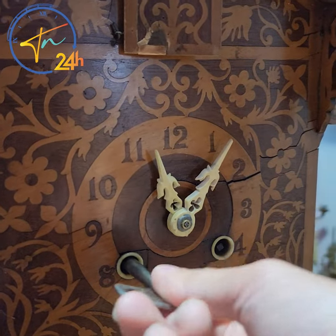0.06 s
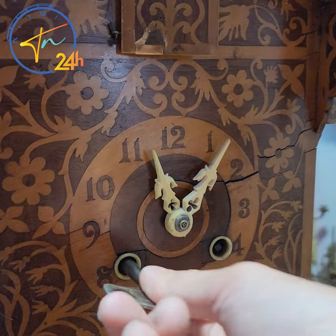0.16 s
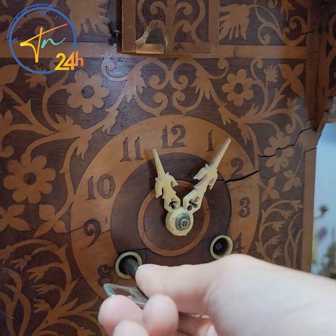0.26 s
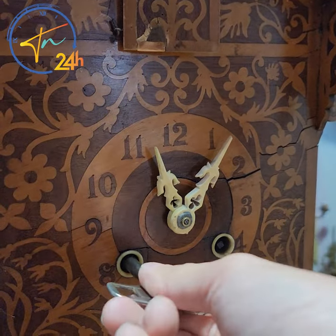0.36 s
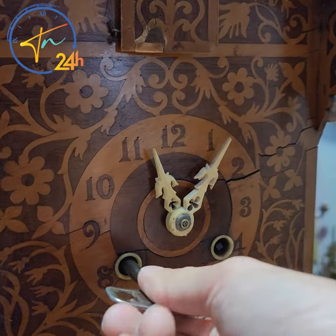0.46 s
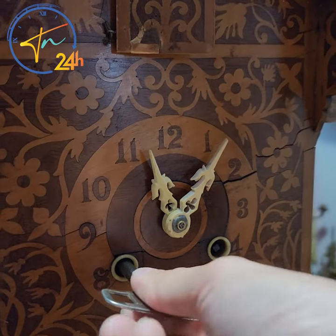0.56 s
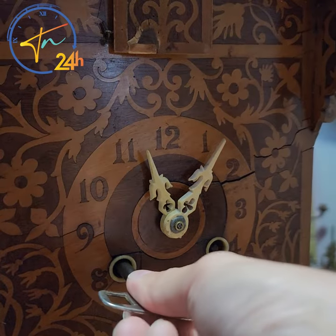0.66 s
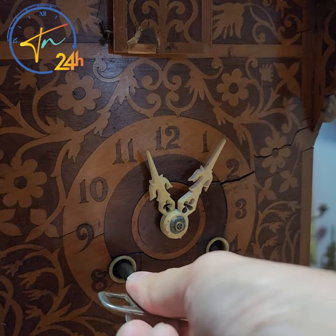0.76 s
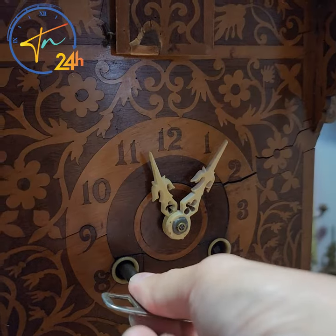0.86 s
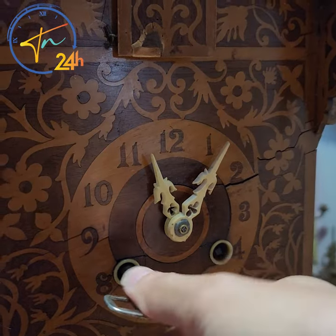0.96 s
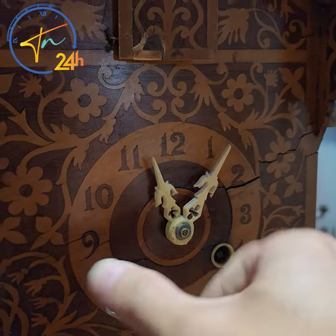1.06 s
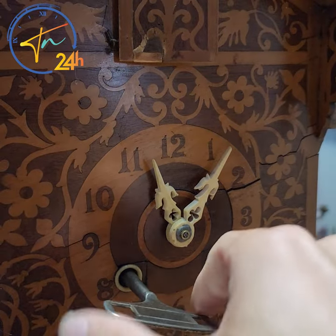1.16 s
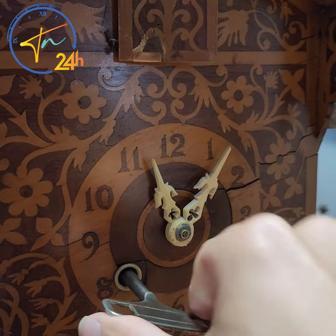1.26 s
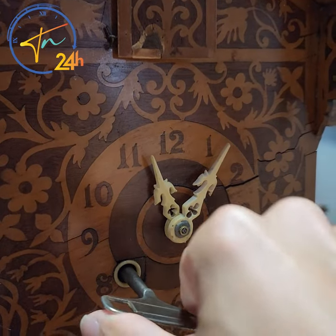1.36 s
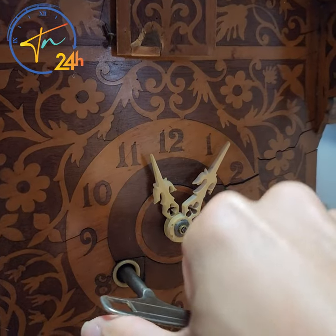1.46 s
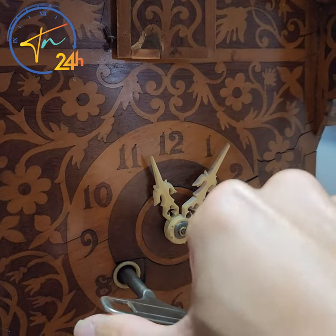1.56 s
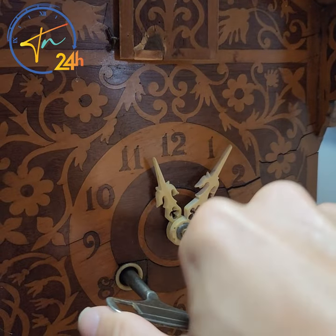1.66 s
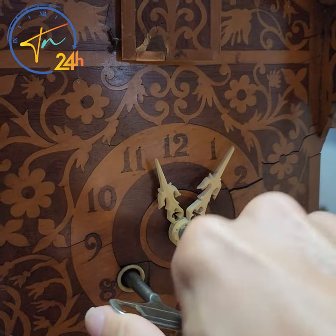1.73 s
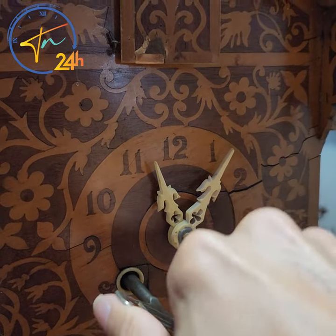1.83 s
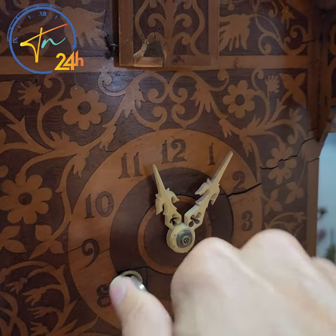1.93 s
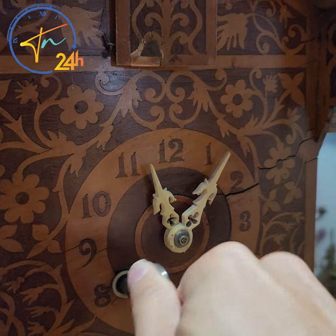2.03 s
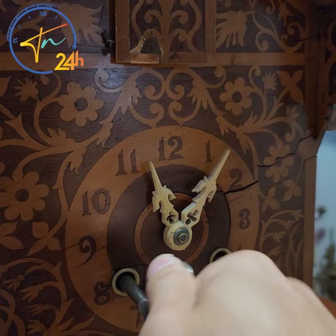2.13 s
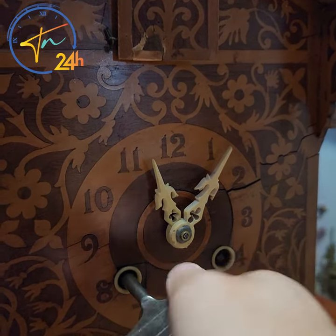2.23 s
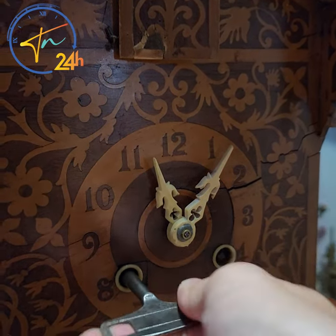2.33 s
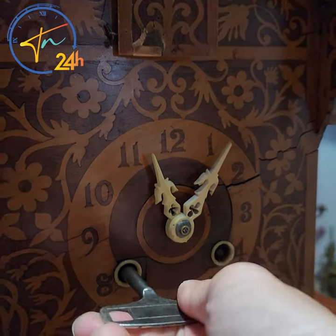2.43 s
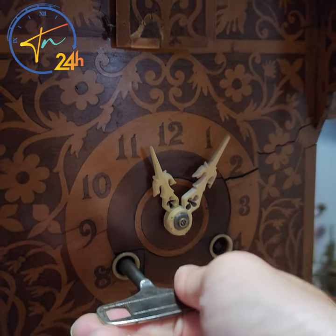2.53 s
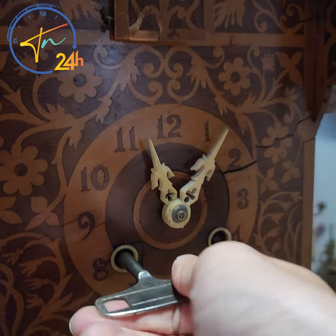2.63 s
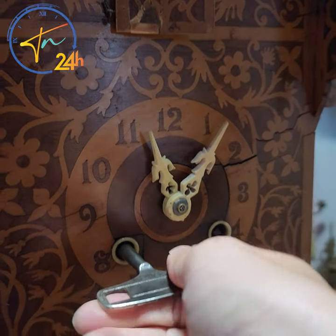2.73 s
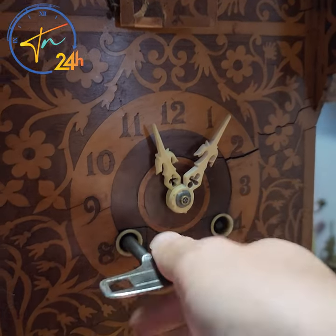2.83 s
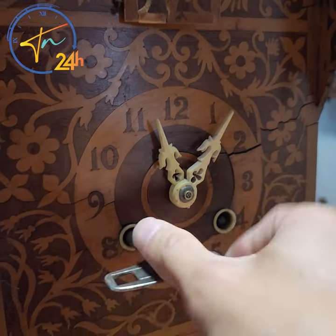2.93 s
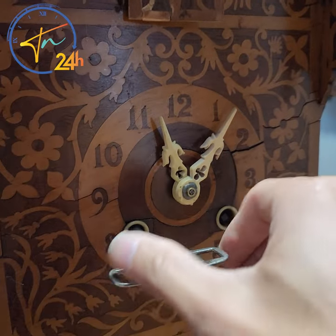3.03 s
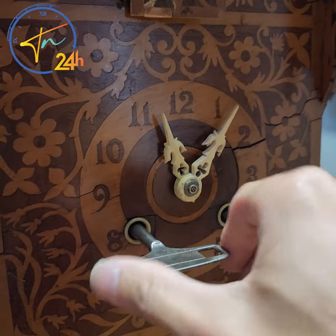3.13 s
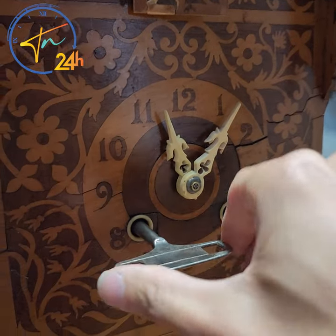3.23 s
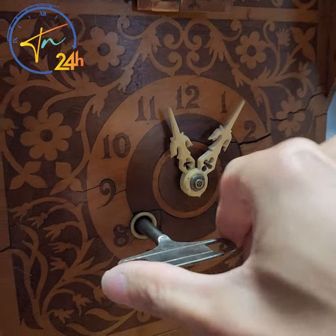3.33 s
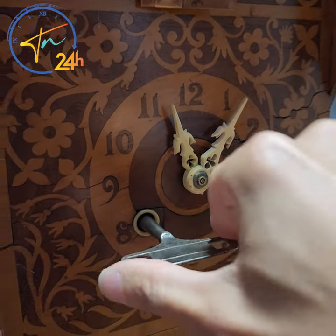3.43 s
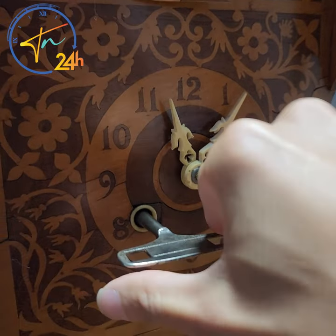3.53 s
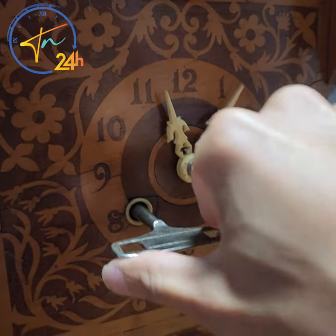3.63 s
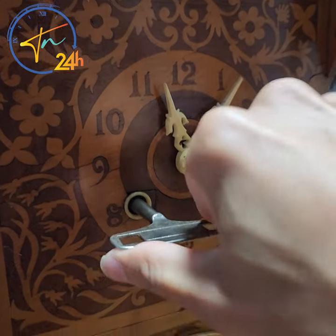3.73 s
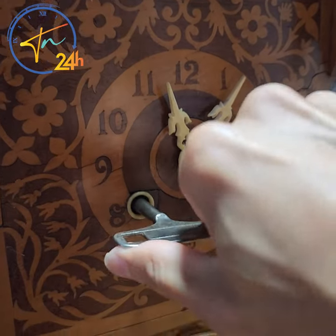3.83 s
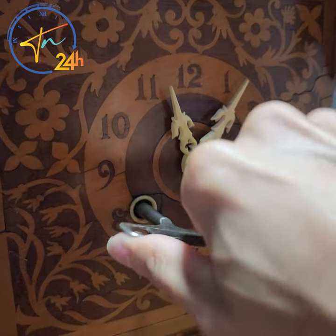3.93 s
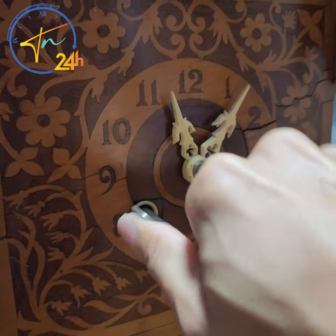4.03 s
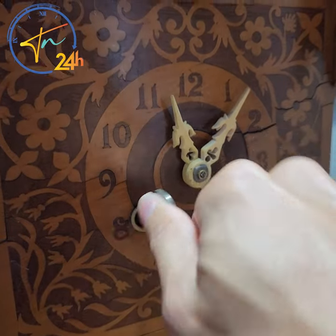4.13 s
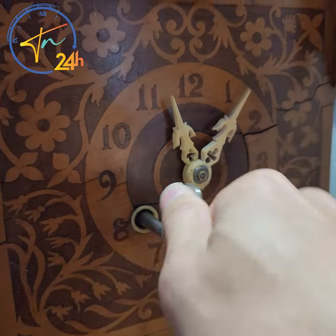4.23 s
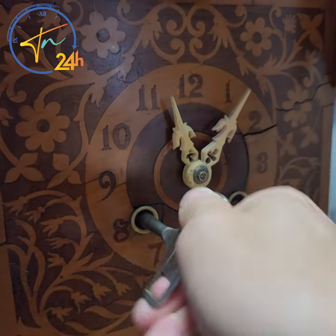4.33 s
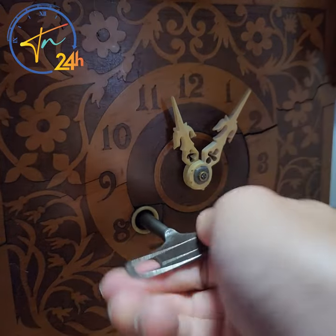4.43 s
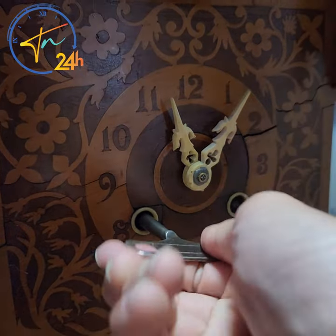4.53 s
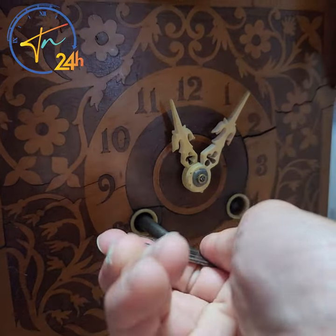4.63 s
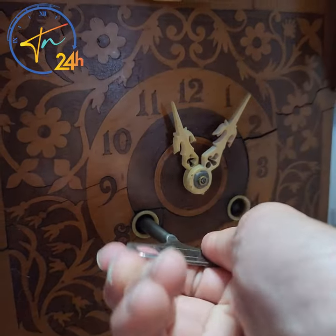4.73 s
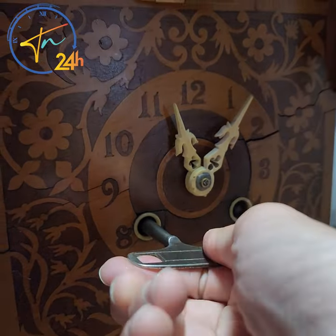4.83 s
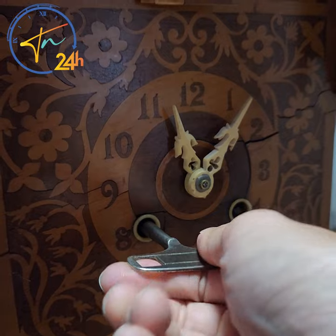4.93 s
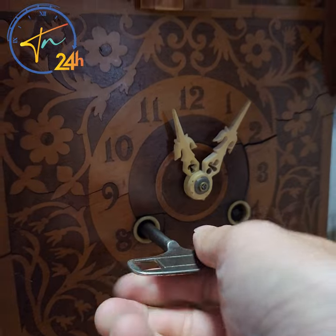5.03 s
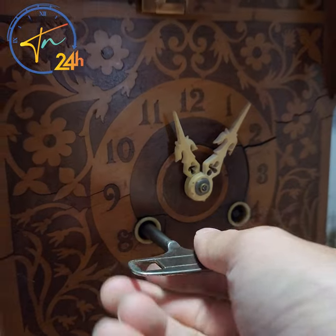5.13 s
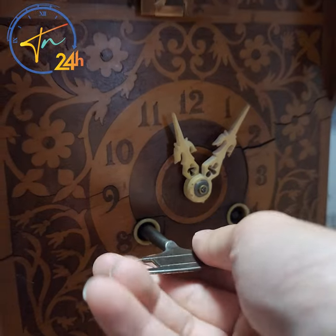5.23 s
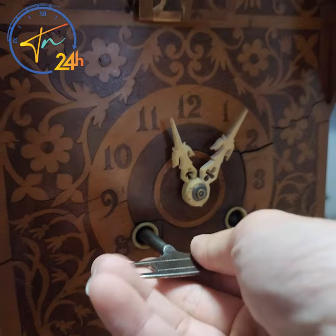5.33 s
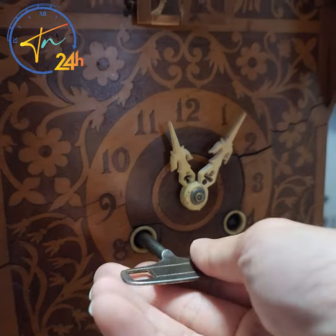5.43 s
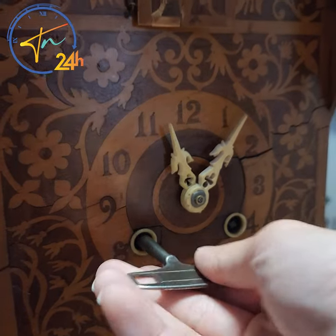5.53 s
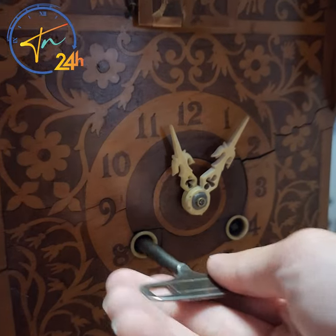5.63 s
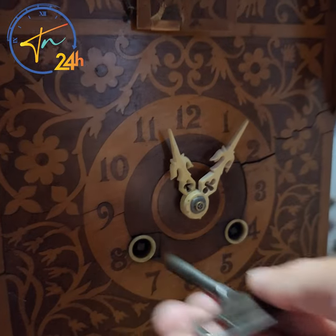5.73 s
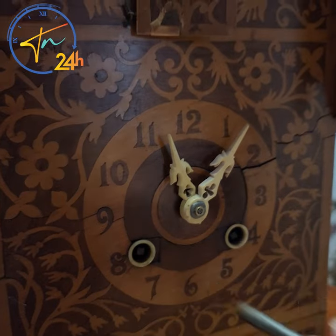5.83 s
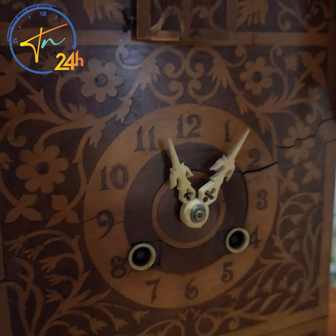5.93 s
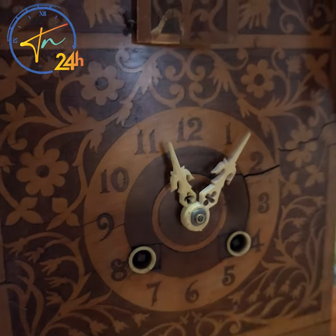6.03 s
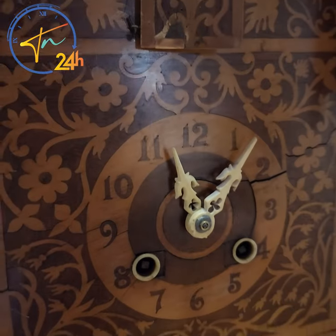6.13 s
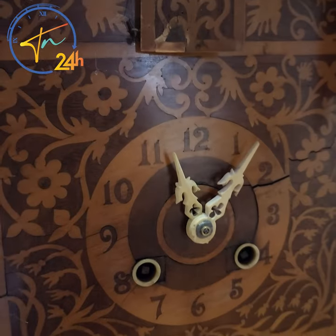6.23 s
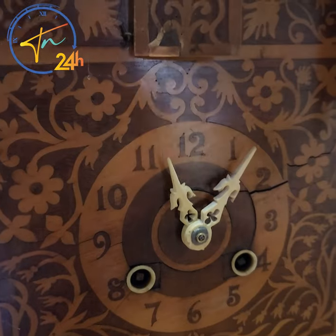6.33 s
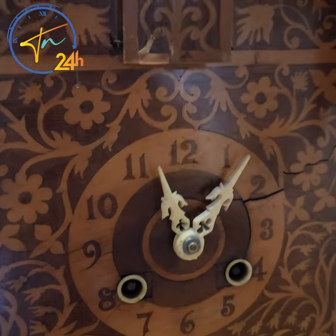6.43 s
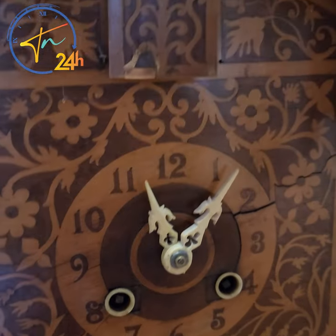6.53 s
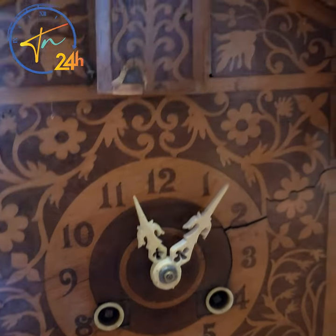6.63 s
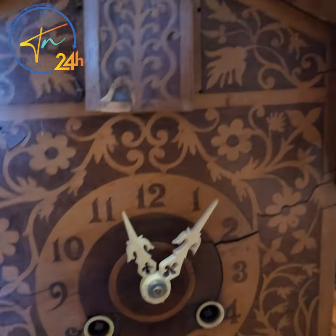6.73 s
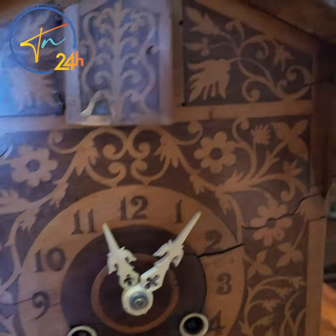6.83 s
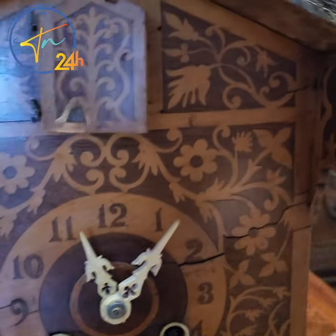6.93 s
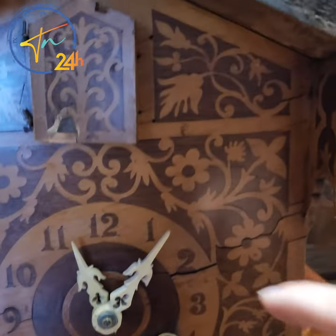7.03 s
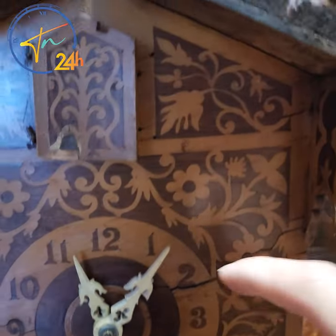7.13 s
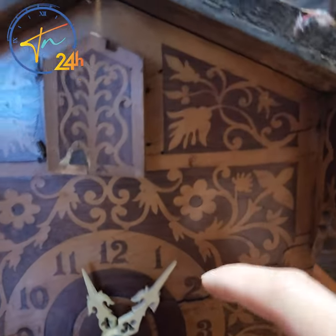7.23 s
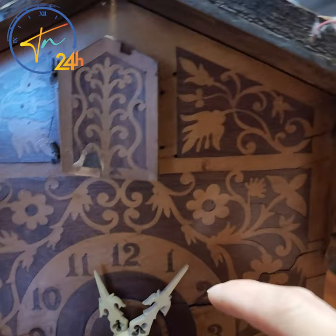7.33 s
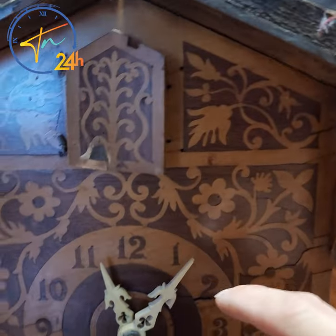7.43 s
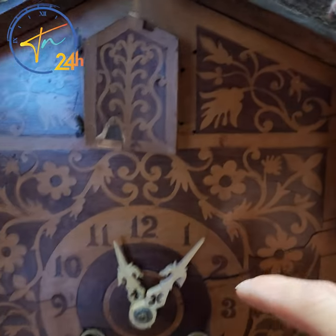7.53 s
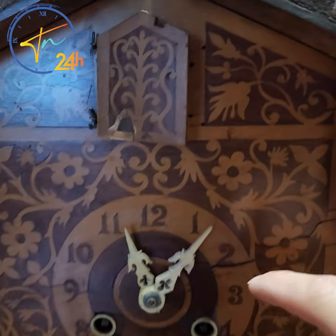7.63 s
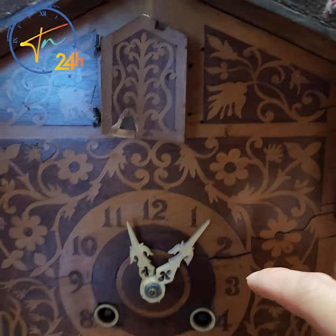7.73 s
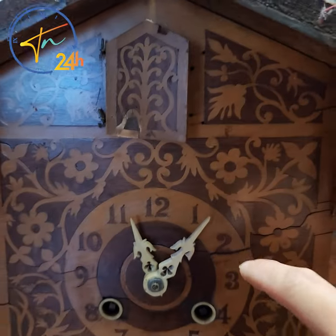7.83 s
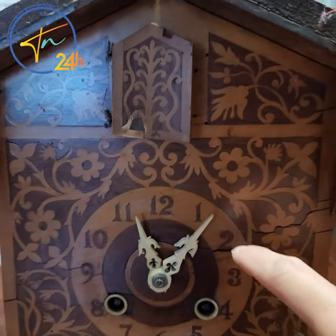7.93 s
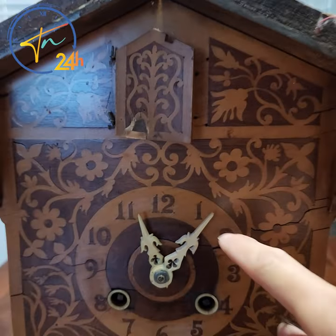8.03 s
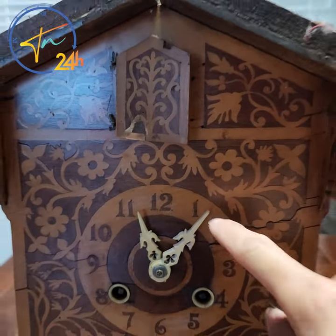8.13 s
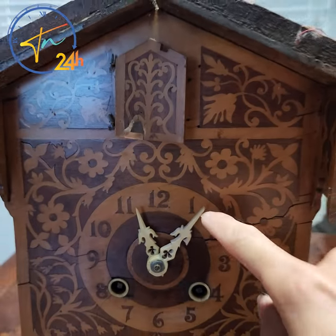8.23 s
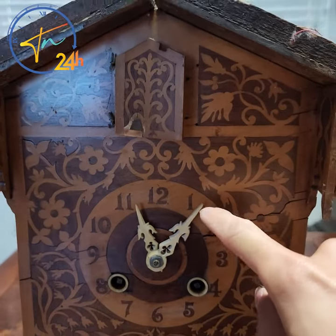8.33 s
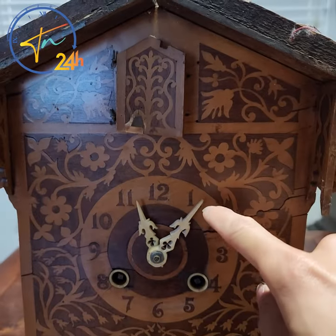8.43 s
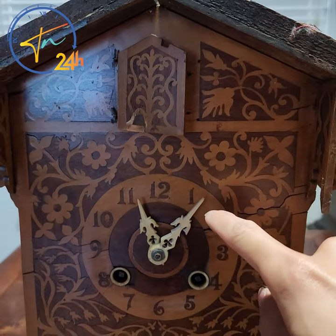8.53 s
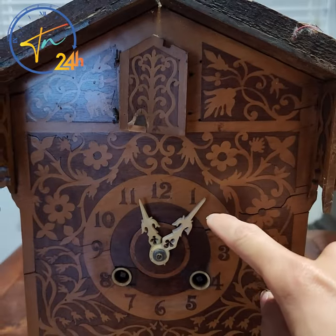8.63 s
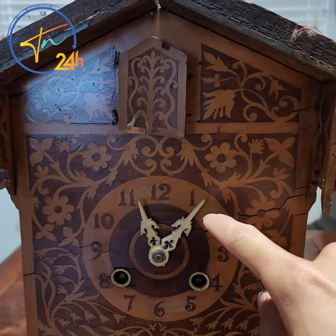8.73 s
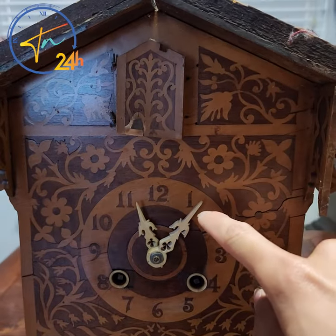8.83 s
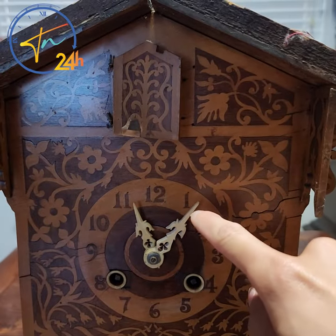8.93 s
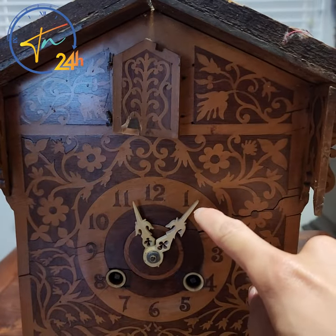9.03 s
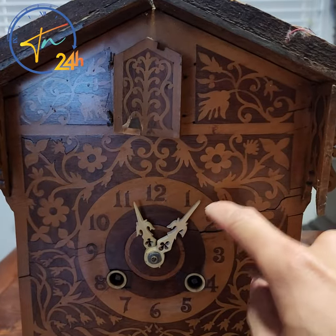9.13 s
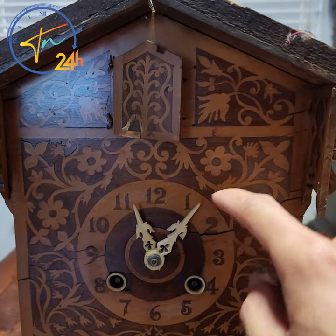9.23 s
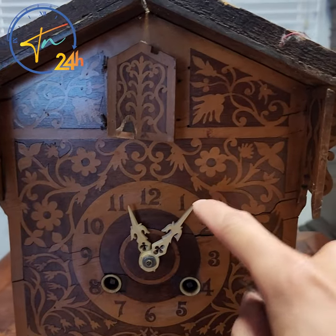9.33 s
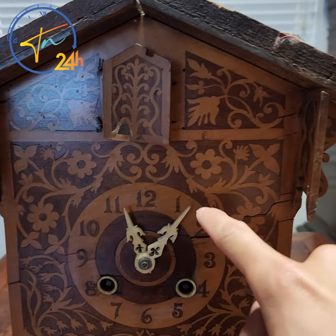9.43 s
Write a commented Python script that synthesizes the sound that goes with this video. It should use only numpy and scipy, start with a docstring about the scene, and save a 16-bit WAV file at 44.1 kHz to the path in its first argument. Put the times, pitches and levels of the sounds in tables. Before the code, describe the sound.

Two rapid runs of loud metallic ratchet snaps over steady, slightly uneven clock ticking, with key knocks and a later microphone bump.

```python
"""The pawl of a wooden cuckoo clock snaps over its ratchet: two turns of a steel key, each snap a noise burst
through steel and wood resonances. The clock ticks close by, slightly out of beat, as two pallets strike in turn.
Around and between the turns the key knocks, scrapes and squeaks on its arbor and the case booms softly; the key
is drawn out, the microphone is bumped and a fingertip brushes the minute hand. Shaped noise makes the quiet
room's rumble, murmur and hiss; decaying noise makes its reverberation."""
import sys
import numpy as np
from scipy import signal
from scipy.fft import rfft, irfft, next_fast_len
from scipy.io import wavfile
from scipy.ndimage import uniform_filter1d

SR = 44100
rng = np.random.default_rng(int(sys.argv[2]) if len(sys.argv) > 2 else 0)


def dump(signal):
    """Clip the signal to [-1, 1] and save it as 16-bit WAV at the path in sys.argv[1]."""
    limited = np.clip(np.atleast_2d(signal).T, -1, 1)
    pcm = np.round(limited * 32767).astype(np.int16)
    wavfile.write(sys.argv[1], SR, pcm)


N = 417627
TIME = np.arange(N) / SR
AGE = TIME[:SR // 8]  # seconds since a contact
SIZE = next_fast_len(N + SR, True)
HZ = np.fft.rfftfreq(SIZE, 1 / SR)


def amp(db):
    """Logarithmic level: decibels to amplitude gain."""
    return 10 ** (np.asarray(db) / 20)


def unit(x):
    """Normalization: scale to an rms of 1."""
    return x / np.sqrt(np.mean(x ** 2) + 1e-20)


def decay(t60):
    """Exponential damping: 60 dB lost in t60 seconds."""
    return amp(-60 * AGE / t60)


def onset(rise):
    """Gradual onset: the gain grows from 0 towards 1 on a time scale of rise seconds."""
    return 1 - np.exp(-(AGE / rise) ** 2)


def sine(hz):
    """Simple harmonic motion at one pitch."""
    return np.sin(2 * np.pi * hz * AGE)


def along(points, hz=HZ):
    """Interpolation of (hz, value) points on a logarithmic frequency axis."""
    point_hz, value = np.transpose(points)
    return np.interp(np.log(hz + 1), np.log(point_hz + 1), value)


def filtered(x, response):
    """Linear filtering: the spectrum is multiplied by a frequency response."""
    return irfft(rfft(x, SIZE) * response, SIZE)[..., :N]


def colour(points):
    """Minimum phase: a causal response with the given spectrum and a mean power gain of 1."""
    cepstrum = irfft(np.log(amp(along(points))), SIZE)
    cepstrum[1:SIZE // 2] *= 2
    cepstrum[SIZE // 2 + 1:] = 0
    response = np.exp(rfft(cepstrum))
    return response / np.sqrt(np.mean(abs(response) ** 2))


def body(modes):
    """Modal superposition: damped resonances of alternating sign, with a mean power gain of 1."""
    response = 0
    for k, (hz, width_hz, db) in enumerate(modes):
        damping = 1j * HZ * width_hz
        response = response + (-1) ** k * amp(db) * damping / (hz * hz - HZ ** 2 + damping)
    return response / np.sqrt(np.mean(abs(response) ** 2))


# Left-right likeness of the clock's sound: pitch_hz, correlation (0-1)
ALIKE = [(200, 1), (600, 0.71), (1400, 0.32), (5000, 0.37), (12000, 0.053)]
LEAD_S = 0.0003367  # arrival at the left ahead of the right


def heard(pair, response, alike=ALIKE):
    """Interaural coherence and delay: two drives through a response, blended into left and right; the left leads."""
    turn = np.arccos(np.clip(along(alike), -1, 1)) / 2
    mid, side = rfft(pair, SIZE) * response * np.array([np.cos(turn), np.sin(turn)])
    lead = np.exp(1j * np.pi * HZ * LEAD_S)
    return irfft([(mid + side) * lead, (mid - side) / lead], SIZE)[:, :N]


def noise(size=N):
    """Statistical independence: two unrelated white noises."""
    return rng.standard_normal((2, size))


def chatter(rise, t60, habit=0, share=0):
    """Contact noise: a brief rattle builds up and dies; a share of its power repeats the part's habitual grain."""
    shape = onset(rise) * decay(t60)
    share = np.clip(share, 0, 1)
    grain = np.sqrt(share) * habit + np.sqrt(1 - share) * noise(len(AGE))
    return shape / shape.max() * grain


def add(track, s, sound):
    """Superposition: mix a sound into a track at time s."""
    part = track[..., max(0, round(s * SR)):][..., :sound.shape[-1]]
    part += sound[..., :part.shape[-1]]


def tinted(x, points):
    """Spectral equalization: a short contact is evened out, then given its own (hz, db) colour."""
    size = 2 * x.shape[-1]
    spectrum = rfft(x, size)
    power = abs(uniform_filter1d(abs(spectrum) ** 2, size=300, axis=-1)) + 1e-30
    evened = spectrum * np.sqrt(power.mean() / power)
    tint = amp(along(points, np.fft.rfftfreq(size, 1 / SR)))
    return irfft(evened * tint, size)[..., :size // 2]


def strokes(rows, attack, release):
    """Power addition of envelopes: one gain per sample for each db column of (start, length, db, ..) rows."""
    power = 0
    for start, length, *db in rows:
        corners = [start - attack, start, start + length, start + length + release]
        shape = np.interp(TIME, corners, [0, 1, 1, 0]) ** 2
        power = power + (amp(db)[:, None] * shape) ** 2
    return np.sqrt(power)


# Spectra of the room's rumble, murmur and hiss: pitch_hz, density_db
RUMBLE = [(12, -43.5), (20, -5.5), (70, 1.5), (150, -7), (182, -8.5), (211, -29.5), (300, -12),
          (390, -41.5), (660, -120)]
MURMUR = [(80, -15), (170, -9.5), (250, 1.5), (380, -9.5), (700, -18.5), (2000, -51.5)]
HISS = [(300, 0), (600, -6), (900, -14), (1250, -12), (2000, -15), (2800, -22), (4000, -24), (6000, -24),
        (7600, -22), (9000, -29), (10500, -38), (16000, -42)]
# Left-right likeness of the room tone: pitch_hz, correlation (0-1)
STILL = [(60, 1), (180, 0.97), (550, 0.37), (1650, 0), (15000, 0.086)]
# The hand resting on the key: start_s, length_s, rumble_db, murmur_db
HOLD = [(0.0, 5.65, -66, -67)]
# The hand bearing on the key and its spring: start_s, length_s, rumble_db, murmur_db
STRAINS = [(0.094, 0.17, -54, -57), (0.31, 0.021, -43.5, -49.5), (0.48, 0.11, -55, -68),
           (1.185, 0.079, -56, -77), (1.92, 0.51, -60.5, -56.5), (2.703, 0.18, -55.5, -59.5),
           (3.072, .08, -53.5, -55.5), (3.988, 0.61, -64, -53.5), (5.48, 0.15, -57, -56)]


def room_tone(still_rumble_db=-64, still_murmur_db=-70, attack_s=0.026, release_s=0.17):
    """Stationary and modulated noise: rumble and murmur swell as the hand bears on the key; the hiss is steady."""
    rumble_gain, murmur_gain = strokes(HOLD + STRAINS, attack_s, release_s)
    rumble = np.hypot(amp(still_rumble_db), rumble_gain) * heard(noise(), colour(RUMBLE), STILL)
    murmur = np.hypot(amp(still_murmur_db), murmur_gain) * heard(noise(), colour(MURMUR), STILL)
    hiss = amp(-66.5) * heard(noise(), colour(HISS), STILL)
    return rumble + murmur + hiss


# Colour of the reverberation: pitch_hz, gain_db
ECHO = [(200, -11), (600, 4), (1900, 5), (5000, 2), (15000, 5.5)]
# Reverberation time: pitch_hz, t60_s
ROOM = [(200, .8), (1000, .52), (2000, .54), (3000, .58), (5000, .66), (8000, .58), (12000, .32),
        (16000, .22)]


def wall_tail():
    """Frequency-dependent absorption: the walls' answer to a click, each frequency dying at its own speed."""
    hz, t, grain = signal.stft(noise(SR * 5 // 8), SR, nperseg=256)
    fading_db = along(ECHO, hz)[:, None] - 60 * t / along(ROOM, hz)[:, None]
    tail = signal.istft(grain * amp(fading_db), SR, nperseg=256)[1]
    flutter = unit(uniform_filter1d(rng.standard_normal(tail.shape[1]), size=200))
    tail *= amp(2.0 * flutter)  # the tail's loudness flutters at random
    tail *= 1 - np.exp(-(TIME[:tail.shape[1]] / 0.005) ** 2)  # reflections need time to arrive
    return tail / np.linalg.norm(tail[0])


def room(x, drift_s=.43):
    """Time-varying reverberation: the sound drifts in a steady cycle between two wall tails."""
    turn = 2 * np.pi * TIME / drift_s
    first = signal.fftconvolve(x * np.cos(turn), wall_tail(), axes=1)
    second = signal.fftconvolve(x * np.sin(turn), wall_tail(), axes=1)
    return (first + second)[:, :N]


# Jostles and taps on the microphone, relative levels: start_s, thud_db, tap_db
BUMPS = [(0.312, -38, -60), (6.767, -32.5, -54), (7.216, -35.5, -79), (7.243, -37, -75), (7.604, -10, -16),
         (8.103, -39, -69.5), (8.139, -38, -70)]


def bump(thud_hz=82, thud_t60=0.015, tap_hz=470, tap_t60=0.0048, crack_db=-14):
    """Damped oscillation: knocks on the microphone's housing swing low and die fast, with a sharper tap on top."""
    thud = -sine(thud_hz) * decay(thud_t60)
    tap = np.cos(2 * np.pi * tap_hz * AGE) * decay(tap_t60)
    track = np.zeros((2, N))
    for s, thud_db, tap_db in BUMPS:
        crack = amp(crack_db) * chatter(rise=0.00088, t60=0.019)
        add(track, s, amp(thud_db) * thud + amp(tap_db) * (tap + crack))
    track = signal.sosfilt(signal.butter(4, 55, "highpass", fs=SR, output="sos"), track)
    return filtered(track, 1 / (1 + 1j * HZ / 2000) ** 2) * amp([[-2], [2]])


# Fingertip scuffs on the minute hand, relative levels: start_s, level_db, pitch_hz
TOUCHES = [(7.7807, -62, 2750), (7.791, -66, 2460), (7.813, -57, 1450), (7.817, -75, 2800),
           (7.85, -59, 1350), (7.88, -57.5, 1500), (7.885, -76, 2750), (7.996, -63, 1620),
           (8.023, -68, 3100), (8.7786, -54, 1410)]
# Resonances of the minute hand: pitch_hz, width_hz, level_db
HAND = [(1377, 230, 15), (2800, 250, -6), (7400, 1000, -27)]
# Skin sliding over the key: start_s, length_s, level_db
SLIDES = [(0.915, 0.072, -70)]
# Spectrum of sliding skin: pitch_hz, density_db
SKIN = [(1000, -21), (2500, -4), (4000, -4), (7300, 6), (10000, -10), (15000, -9), (17000, -31)]


def fingertip(rise=0.00077, t60=0.094, width_hz=330, dry_db=-9, slide_attack=0.023, slide_release=0.11):
    """Friction noise: skin hisses over the key, and scuffs on the minute hand excite a resonance at each pitch."""
    scuffs, chirps = np.zeros((2, 2, N))
    for s, db, hz in TOUCHES:
        scuff = amp(db) * chatter(rise, t60)
        add(scuffs, s, amp(dry_db) * scuff)
        resonator = signal.iirpeak(hz, hz / width_hz, fs=SR)
        add(chirps, s, np.sqrt(SR / np.pi / width_hz) * signal.lfilter(*resonator, scuff))
    slide, = strokes(SLIDES, slide_attack, slide_release)
    return heard(chirps, 0.47) + heard(scuffs, body(HAND)) + heard(slide * noise(), colour(SKIN))


# The key squeaking on its arbor, relative levels: start_s, length_s, pitch_hz, level_db
SQUEAKS = [(0.065, 0.01, 3390, -55), (0.1, 0.013, 3440, -55), (0.165, 0.014, 3440, -58),
           (0.185, 0.023, 3480, -55), (5.523, 0.018, 3280, -57), (5.582, 0.014, 1290, -47),
           (5.612, 0.013, 5120, -49)]


def squeaks(waver=.02, edge_s=0.0077, overtone_db=-12):
    """Stick-slip oscillation: steel on steel gives short chirps of wavering pitch with an octave overtone."""
    track = np.zeros(N)
    for s, length, hz, db in SQUEAKS:
        wander = unit(uniform_filter1d(rng.standard_normal(len(AGE)), size=60))
        phase = 2 * np.pi * np.cumsum(hz * (1 + waver * wander)) / SR
        shape = np.interp(AGE, [0, edge_s, edge_s + length, 2 * edge_s + length], [0, 1, 1, 0])
        chirp = np.sin(phase) + amp(overtone_db) * np.sin(2 * phase)
        add(track, s - edge_s, amp(db) * shape * chirp)
    return heard(track * np.array([[1], [0]]), 0.77)


# Fingers nudging the key, relative levels: start_s, level_db
NUDGES = [(0.085, -50), (0.104, -44), (0.121, -46.5), (0.217, -39), (0.316, -39), (0.479, -44),
          (0.571, -44), (0.875, -38), (0.964, -48), (1.188, -52), (1.257, -51), (1.491, -51),
          (1.771, -49.5), (1.962, -38), (2.382, -38.5), (2.679, -45), (2.846, -48), (3.051, -34),
          (3.22, -43), (3.344, -40.5), (3.805, -48.5), (5.175, -42), (5.469, -34.5), (5.518, -54),
          (5.557, -45), (5.573, -44.5)]
# The key knocking on its arbor, relative levels: start_s, level_db, steel_click_db, key_ring_db
KNOCKS = [(0.0211, -37.5, -34, -73), (0.0433, -38, -44, -70), (0.0572, -31.5, -25, -58),
          (0.331, -41.5, -22.5, -68), (0.352, -59.5, -0.5, -68), (2.826, -48, -18, -62),
          (2.841, -37.5, -15, -43.5), (3.1037, -33.5, -40.5, -50.5), (5.459, -47, -30, -74),
          (5.511, -44, -10, -60), (5.539, -46, -19, -68), (5.618, -42.5, -5.5, -67), (5.749, -69.5, 3, -72)]
# The key dragging on its arbor, relative levels: start_s, length_s, case_rumble_db, scrape_db
DRAGS = [(0.06, 0.073, -45, -64), (0.155, 0.049, -43.5, -57.5), (3.075, .05, -49.5, -73),
         (5.468, 0.068, -45, -61), (5.57, 0.024, -49, -58.5), (5.6, 0.027, -54.5, -51.5)]
# Spectrum of scraping steel: pitch_hz, density_db
SCRAPE = [(290, -31.5), (500, -9), (886, -8.5), (1270, -2.5), (1480, -6), (1880, -1.5), (2700, -22.5),
          (3420, -15), (3900, -17.5), (5300, -18), (7400, -15), (14000, -60)]
# Resonances of the hollow case, its wood, the mounting board and the key: pitch_hz, width_hz, level_db
BOOM = [(177, 16, -8.5), (229.7, 12.3, 5), (256.8, 35, -1), (371.3, 48, -15.5)]
CASE = [(359, 18, -3.5), (463, 8.3, 0.5), (519.5, 21, 2), (732, 35, -7), (1006, 87, -7), (1289, 42, 2.5),
        (1397, 84, -2), (1549, 180, -4), (1853, 76, -1), (2093, 44, -1)]
BOARD = [(290, 120, -13), (387, 80, -1), (502.3, 61, 6.5), (696, 66, -8), (1340, 340, -2), (1646, 160, -2),
         (2160, 360, -5.5)]
SHANK = [(2940, 70, -2.5), (3560, 71, 0), (3740, 76, -5), (4120, 70, -16), (5905, 83, -14),
         (7550, 110, -9.5)]


def key(drag_attack_s=0.042, drag_release_s=0.0207):
    """Impact and friction excitation: soft fingers only boom the case; bare steel clicks, scrapes and squeaks."""
    push = np.zeros(N)
    knock, click, clack = np.zeros((3, 2, N))
    for s, db in NUDGES:
        add(push, s, amp(db + 28.0) * np.ones(1))
    for s, db, steel_db, ring_db in KNOCKS:
        add(clack, s, amp(ring_db) * chatter(rise=0.0015, t60=0.029))
        add(knock, s, amp(db + 1.0) * chatter(rise=0.00068, t60=0.05))
        add(knock[0], s + 0.00115, amp(db + 23) * np.ones(1))  # the blow itself rings the wood
        add(click, s, amp(db + steel_db + 6.5) * chatter(rise=0.00053, t60=0.059))
    rumble, scratch = strokes(DRAGS, drag_attack_s, drag_release_s)
    wander = unit(uniform_filter1d(rng.standard_normal(N), SR // 250))
    grip = unit(amp(3 * wander))  # the grip sticks and slips
    rub = rumble * grip * noise()
    scrape = scratch * grip * noise()
    boom = heard(push * np.array([[1], [0]]) + rub, body(BOOM) / (1 + (HZ / 1100) ** 4))
    wood_response = (amp(-3.0) * body(CASE) + amp(-3.5) * body(BOARD)) / (1 + 1j * HZ / 600)
    wood = heard(knock + amp(-3.5) * rub, wood_response)
    shank = heard(clack + amp(-11) * scrape, body(SHANK))
    steel = heard(click + scrape, amp(3.5) * colour(SCRAPE))
    return boom + wood + shank + steel + squeaks()


# Beats, tick and tock in turn, uneven on the worn wheel, relative levels: start_s, level_db, brass_db, case_knock_db
BEATS = [(0.3015, 0, 1, -44), (0.68, -1, 1, -48), (1.0355, 0, 3, -50), (1.4225, -2, 0, -50),
         (1.776, -1, 3, -50), (2.158, 0, 0, -48), (2.515, -2, -2, -48), (2.887, -1, 1, -48),
         (3.254, -1, -2, -48), (3.6455, 0, -1, -47), (4.0, 0, 0, -48), (4.38, 0, 0, -48),
         (4.7415, -2, -2, -41), (5.1142, -1, -2, -48), (5.477, -1, 0, -51), (5.8455, 0, 0, -48),
         (6.2142, 1.5, 0.5, -46), (6.5883, 1, -2, -46), (6.9545, 1.5, -2.5, -44), (7.335, -.5, -1.5, -47),
         (7.6895, 2.5, -1.5, -42), (8.0665, -2, -4, -45), (8.431, -1.5, -1.5, -45), (8.807, -2, -3, -43),
         (9.1695, -2, -1, -47)]
# Entry and exit pallet, relative levels: contact_db, recoil_delay_s, recoil_db, brass_ring_db, repeated_share (0-1)
PALLETS = [(-38, 0.014, -50.5, -6.5, 0.4), (-40.5, .013, -43.5, -4.5, 0.1)]
# Clear notes of each pallet, relative levels: pitch_hz, level_db
PALLET_RINGS = [
    [(3655, -62.5), (9750, -70.5)],
    [(3950, -69), (14720, -72)],
]
# Bands that every beat stresses by its own random amount: pitch_hz
BEAT_HZ = [550, 900, 1400, 2100, 3600, 7500]
# Spectrum of a tick: pitch_hz, density_db
TICK = [(250, -37), (500, -16), (1200, -4.5), (2100, -4), (2500, -15), (3700, -4), (4500, -8.5),
        (6500, -9.5), (7500, -1.5), (8800, -13.5), (9800, -21), (11000, -29.5), (15000, -31), (17000, -51)]
# Resonances of the movement: pitch_hz, width_hz, level_db
MOVEMENT = [(530, 36, 1), (697.4, 33, 2.5), (962.6, 32, -1), (1188.5, 75, 1.5), (1467, 55, -14.5),
            (1545, 38, 1), (2078, 50, -9.5), (3670, 150, -11.5), (4960, 98, -16), (7750, 80, -19.5),
            (7727, 48, -10), (8240, 54, -23), (9616, 150, -11.5), (11690, 120, -31.5)]


def escapement(beat_colour_db=1, note_t60=.12):
    """Alternating impacts: two pallets catch the wheel in turn; contact and recoil ring the movement, a knock the case."""
    dull, bright, knock, notes = np.zeros((4, 2, N))
    habits = [noise(len(AGE)) for _ in PALLETS]
    colours = beat_colour_db * rng.standard_normal((len(BEATS), len(BEAT_HZ)))
    colours -= colours.mean(axis=1, keepdims=True)
    for k, (s, db, brass_db, wood_db) in enumerate(BEATS):
        first_db, delay, recoil_db, ring_db, share = PALLETS[k % 2]
        habit = habits[k % 2]
        contact = amp(db + first_db) * chatter(0.00082, 0.09, habit, share)
        touch_db = db + first_db + rng.normal(2.5, 2.2)
        add(contact, 0, amp(touch_db) * chatter(rise=0.00065, t60=0.01))  # the hard first touch
        recoil = amp(db + recoil_db) * chatter(0.0086, 0.06, habit[:, ::-1], share)
        add(contact, delay * rng.uniform(.75, 1.2), recoil)
        contact = tinted(contact, np.transpose([BEAT_HZ, colours[k]]))
        add(dull, s, contact)
        for hz, note_db in PALLET_RINGS[k % 2]:
            add(notes[0], s, amp(db + note_db + rng.normal(0, 2)) * decay(note_t60) * sine(hz))
        add(bright, s, amp(ring_db + brass_db) * contact)
        add(knock, s, amp(wood_db) * chatter(rise=0.0015, t60=.03))
    high = 1 / (1 + (2700 / (HZ + 1)) ** 8)  # the brass rings above the wood
    drive = filtered(dull, 1 - high) + filtered(bright, high)
    movement = heard(drive, amp(-4.5) * colour(TICK) + amp(-4.5) * body(MOVEMENT))
    case = heard(knock, body(CASE) / (1 + 1j * HZ / 900))
    return (movement + heard(notes, 2) + case) * amp([[-.5], [.5]])


# Pawl snaps, one per ratchet tooth, relative levels: start_s, level_db, pitch_hz, ring_db, low_clank_db, high_ping_db
PAWL = [(1.8866, -9.5, 5990, -19, 4, 0), (1.9579, -7.5, 5870, -16, -1.5, 0.5),
        (2.0202, -8.5, 3580, -14, 3, 0.5), (2.0853, -8.5, 4140, -25, 0, 0.5),
        (2.1401, -8, 6170, -11, -0.5, 0.5), (2.1979, -8, 6610, -12, 0, -1),
        (2.2438, -8.5, 6450, -7.5, -2.5, 0), (2.2963, -9.5, 5300, -12.5, -1.5, 2),
        (2.376, -8.5, 5130, -16, -2, 0), (3.9648, -10, 5070, -14.5, -1.5, 3),
        (4.0366, -8.5, 5140, -12, -2.5, -1.5), (4.099, -9.5, 4940, -7, -6.5, -0.5),
        (4.157, -10, 5070, -20, 2, -2.5), (4.215, -8.5, 5140, -12.5, 1, -2),
        (4.2724, -9.5, 4900, -17.5, 1.5, -2.5), (4.324, -10, 4940, -12.5, -1.5, 0),
        (4.365, -10, 5080, -13, -6, -2), (4.4138, -11, 5070, -16.5, -0.5, -0.5),
        (4.4615, -9.5, 5170, -14.5, 2.5, 2), (4.5406, -11, 4870, -21, 1, 1)]
# Spectra of the snap and of what the ratchet sends into the room: pitch_hz, density_db
SNAP = [(300, -31), (1000, -11.5), (2800, -9), (3400, -13), (4500, -1.5), (5000, -4), (7400, -5.5),
        (8600, -4), (10500, -3), (12500, -1.5), (15400, -2.5), (16500, -26)]
SPILL = [(300, -9), (800, -6.5), (1300, -4), (1750, 0), (2150, 1.5), (2900, -9), (4200, -4.5), (5000, -4.5),
         (7300, -1), (8500, -2.5), (9700, -6), (12500, 3), (15700, -3.5), (16200, -31)]
# Resonances of the ratchet's steel: pitch_hz, width_hz, level_db
STEEL = [(2440, 950, -15), (3347, 217, 4), (4152, 120, -1.5), (5000, 150, 8.5), (6370, 380, -5.5),
         (6520, 110, 4.5), (7500, 390, 3), (8600, 120, 1.5), (8380, 180, -2.5), (10300, 140, -3.5),
         (11943, 250, -6.5), (12450, 280, -0.5), (11850, 230, 1.5), (13780, 120, 2), (13300, 180, -4)]


def ratchet(ring_rise=0.0003, ring_t60=0.0196, same=0.16, sparkle_db=-3.5, blow_db=-6.5, rattle_db=-31):
    """Impulsive excitation of coupled bodies: steel cracks at each tooth and wood answers; returns direct and spill."""
    snap, sparkle, ring, blow, knock = np.zeros((5, 2, N))
    habit = noise(len(AGE))  # grain common to all teeth
    bounces = rng.uniform(.0005, .0014, len(PAWL))  # the pawl bounces once
    for (s, db, ring_hz, ring_db, clank_db, ping_db), bounce in zip(PAWL, bounces):
        crack = amp(db) * chatter(rise=0.0016, t60=0.012, habit=habit, share=same)
        add(crack, bounce, amp(-7.0) * crack)
        tone = [(2400, 0), (3200, clank_db), (3900, clank_db), (4800, -0.29),
                (6300, -1), (7300, ping_db), (8800, ping_db), (10500, 0)]
        add(snap, s - .0008, tinted(crack, tone))
        add(snap, s, amp(db - 19.5) * chatter(rise=0.0042, t60=0.048))
        add(sparkle, s, amp(db + sparkle_db) * chatter(rise=0.0022, t60=0.018))
        slip = amp(db - 23.0) * chatter(rise=0.002, t60=0.012)
        add(snap, s - .0025, slip)  # the pawl slips over the tooth's tip
        add(ring[0], s, amp(ring_db) * decay(ring_t60) * onset(ring_rise) * sine(ring_hz))
        add(blow[0], s + 0.00062, amp(db + blow_db) * np.ones(1))  # one clean blow on the mounting board
        add(blow, s, amp(db - 25.0) * chatter(rise=0.0032, t60=0.013))
        add(knock, s, amp(rattle_db) * chatter(rise=0.0043, t60=.016))
    high = 1 / (1 + (9500 / (HZ + 1)) ** 12)  # the highest modes start a moment later
    drive = filtered(snap, 1 - high) + filtered(sparkle, high)
    steel = heard(drive, amp(-4.5) * colour(SNAP) + amp(-7.0) * body(STEEL)) + heard(ring, 1)
    board = heard(blow, amp(4) * body(BOARD))
    case = heard(knock, amp(4.0) * body(CASE) + amp(-11.5) * body(BOOM))
    direct = steel * amp([[1], [-1]]) + (board + case) * amp([[-.7], [.7]])
    spill = heard(drive, colour(SPILL)) + heard(ring, amp(-3))
    return direct, spill


def scene():
    """Superposition of direct and reverberant sound: the clock close in front, the room around it."""
    winding, spill = ratchet()
    ticking = escapement()
    handling = key() + fingertip()
    walls = room(amp(-15.0) * spill + amp(-14.5) * ticking + amp(-15.0) * handling)
    return winding + ticking + handling + walls + bump() + room_tone()


def record(dry, top_hz=16300):
    """Band limiting: a very steep low-pass at top_hz."""
    return filtered(dry, 1 / (1 + (HZ / top_hz) ** 120))


dry = scene()
out = record(dry)
dump(out)
```